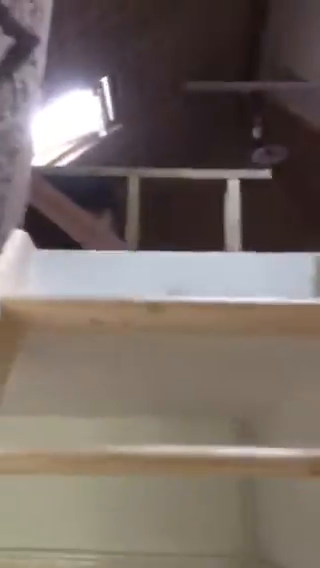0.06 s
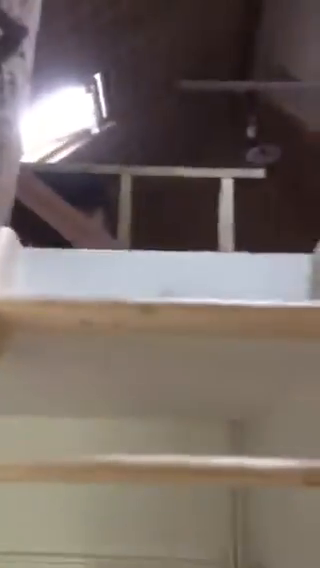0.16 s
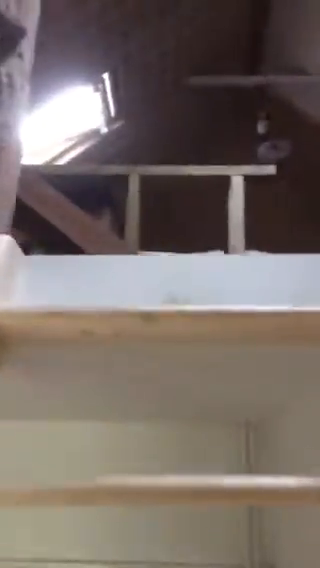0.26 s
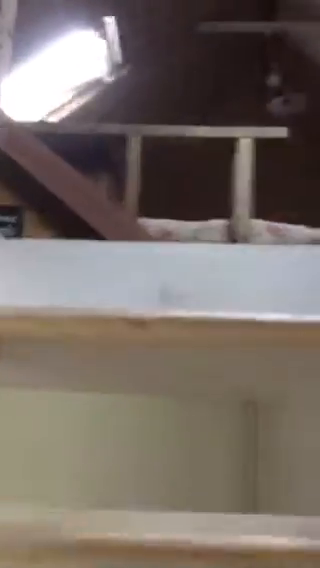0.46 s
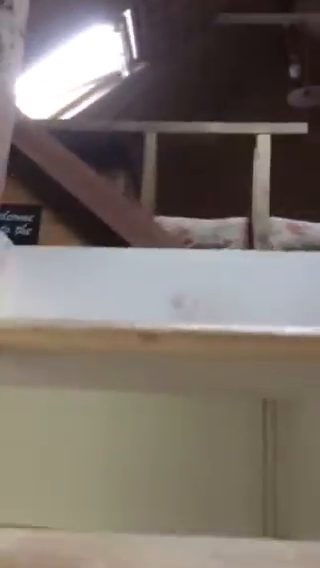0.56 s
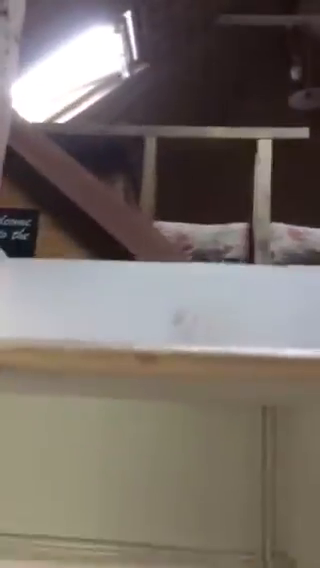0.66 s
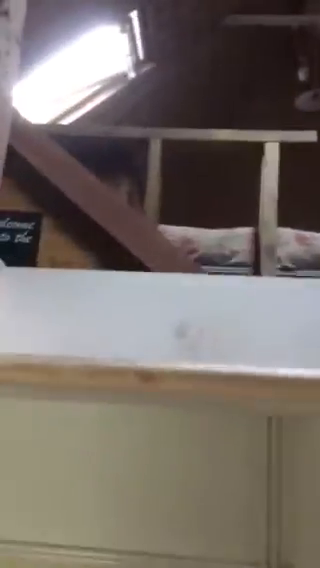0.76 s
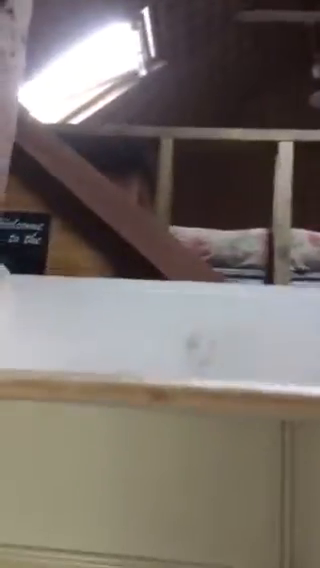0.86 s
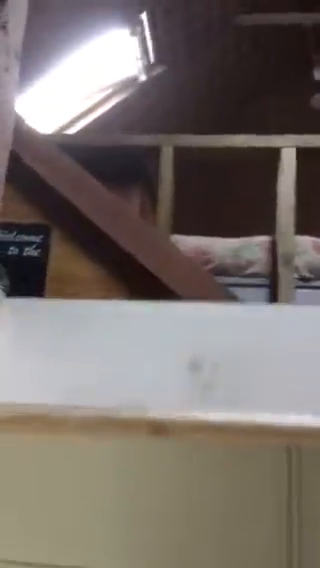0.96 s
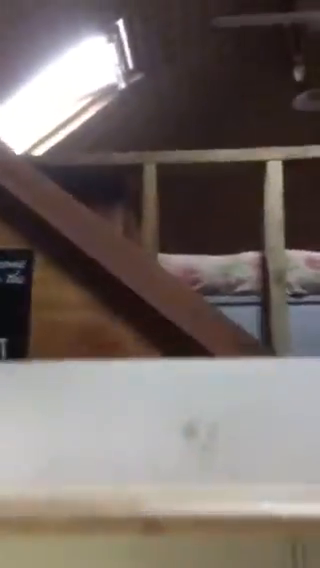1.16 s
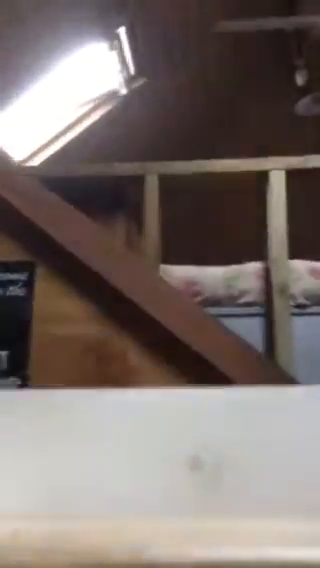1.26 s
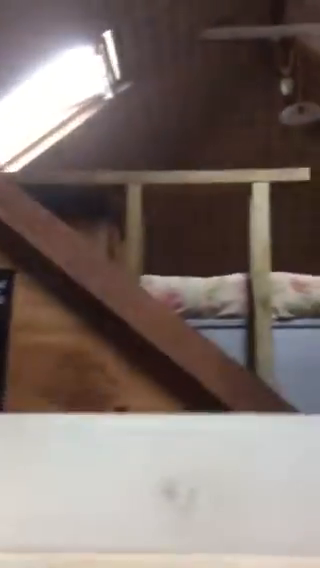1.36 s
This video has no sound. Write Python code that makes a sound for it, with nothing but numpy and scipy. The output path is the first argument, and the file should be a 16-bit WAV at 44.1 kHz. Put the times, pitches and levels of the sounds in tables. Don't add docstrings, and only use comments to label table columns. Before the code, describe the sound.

Two heavy footsteps on a wooden ladder-stair, close up: a hard heel slap with deep hollow boom, then soft sole scuffs and tiny catches, then a lighter knocking second step and faint creak, in a small attic.

```python
import sys
import numpy as np
from scipy import signal
from scipy.fft import rfft, irfft, next_fast_len
from scipy.io import wavfile
from scipy.ndimage import map_coordinates

SR = 44100
rng = np.random.default_rng(int(sys.argv[2]) if len(sys.argv) > 2 else 0)


def transcribe(u):
    v = np.clip(np.atleast_2d(u).T, -1, 1)
    q = np.round(v * 32767).astype(np.int16)
    wavfile.write(sys.argv[1], SR, q)


def makeup_ratio(level_db):
    decades = np.asarray(level_db, float) / 20
    return 10 ** decades


N = 61740
T = np.arange(SR * 3 // 4) / SR

# (time [s], slap level [dB], crack level [dB])
FIRST_STEP = [
    (.231, -39.5, -70),
    (.2353, -40.5, -60),
    (.245, -38, -53.5),
    (.254, -29.5, -34.5),
    (.28, -42.5, -62),
]
SECOND_STEP = [
    (.9207, -35, -59.5),
    (.926, -36.5, -57.5),
    (.936, -48.5, -68),
    (.9725, -42, -50),
]
# (frequency [Hz], level [dB])
FIRST_SLAP = [(260, -34), (450, -3.5), (862, -7), (1250, -4), (2260, -10), (3700, -14.5), (4600, -29),
              (6000, -30), (7800, -58), (13200, -120)]
SECOND_SLAP = [(250, -63), (450, -8), (800, -1.5), (1400, -14), (1750, -9), (2500, -14), (2900, -21),
               (6000, -35.5), (8000, -66), (13000, -120)]
# (frequency [Hz], level [dB])
CRACK_COLOUR = [(2060, -5.5), (3500, -1.5), (4180, -10.5), (6820, -1), (7650, -3), (11000, -6),
                (16000, -21)]

# (time [s], pitch [Hz], level [dB], time to fade by 60 dB [s], swell time [s])
FIRST_BOOM = [(.23, 264.2, -34.5, 0.26, 0.005), (.231, 304, -36.5, 0.32, 0.0034),
              (.231, 197, -36.5, 0.17, 0.0066), (.245, 412, -40, 0.22, 0.0046),
              (.245, 86.5, -58, .2, 0.032), (.257, 121.7, -17, 0.3, 0.016), (.261, 157.2, -17, 0.12, 0.014),
              (.238, 133, -38, 0.13, .01), (.335, 310, -45.5, 0.21, .015), (.33, 425, -52, .15, .012),
              (.27, 272.5, -34, 0.16, 0.0033), (.29, 59.8, -27, 0.39, 0.03), (.3, 113, -24.5, 0.26, 0.015),
              (.3, 144.8, -24, 0.34, 0.035), (.31, 193.1, -32.5, 0.36, 0.034),
              (.47, 61.1, -38, 0.36, 0.046), (.49, 143.6, -42.5, 0.24, 0.017),
              (.595, 271, -52, 0.14, 0.026), (.6, 336, -59, 0.15, 0.01)]
SECOND_BOOM = [(.9205, 475, -37, 0.067, 0.002), (.93, 77.7, -35.5, 0.27, 0.014),
               (.921, 159.4, -32.5, 0.17, 0.0029), (.921, 213, -36, 0.079, 0.0024),
               (.935, 264.4, -32.5, 0.2, 0.0066), (.944, 204.2, -24, 0.22, 0.015),
               (.98, 274.6, -39, 0.16, 0.008), (1.005, 150, -36, 0.29, 0.019), (.94, 245, -41, 0.46, 0.031),
               (.96, 153.8, -30.5, 0.4, 0.0073), (.97, 60, -35.5, 0.44, 0.015),
               (.99, 102.1, -43, 0.44, 0.06), (1.04, 204, -49, 0.3, 0.015),
               (1.105, 165.6, -37, 0.13, 0.016), (1.135, 183, -39.5, 0.14, 0.018),
               (1.14, 55.2, -40.5, 0.19, 0.02), (1.18, 79.7, -55, 0.36, 0.022)]
# (frequency [Hz], level [dB])
RUMBLE_COLOUR = [(30, -47), (55, -5.5), (150, 0), (300, -9), (500, -29.5), (900, -120)]
# (time [s], pitch [Hz], level [dB], time to fade by 60 dB [s])
BOARD_KNOCKS = [(.9207, 2100, -34.5, 0.036), (.9215, 650, -46, 0.017), (.925, 800, -34.5, 0.071),
                (.927, 874, -37, 0.068), (.922, 560, -51, 0.036), (.933, 948, -35.5, 0.068),
                (0.97, 1760, -35.5, 0.035), (0.96, 2200, -53, 0.026), (.975, 5400, -50.5, 0.029),
                (0.98, 3640, -49.5, .03), (0.98, 1152, -33, 0.027), (.9737, 2883, -41, 0.031),
                (0.25, 1700, -37, 0.084), (.26, 945, -40, 0.13), (.2585, 1226, -34, .04),
                (.2353, 3170, -41, 0.027), (.232, 3660, -45.5, .05), (.2313, 2620, -41, .03),
                (.29, 1400, -42.5, .04)]

# (start [s], length [s], level [dB], body pitch [Hz], brightness [dB])
SCUFF_STROKES = [(0.223, 0.038, -45.5, 2970, -14), (0.51, 0.11, -74, 650, -28),
                 (0.799, 0.098, -72.5, 316, -30), (1.089, 0.077, -70, 700, -30),
                 (0.496, 0.22, -67, 3530, 6), (0.396, 0.12, -67, 780, -30), (0.253, 0.098, -54, 2470, -8),
                 (0.43, 0.076, -62.5, 2500, 8.5), (.46, .12, -67.5, 2560, 4), (.845, .09, -75.5, 7700, 9),
                 (.56, .1, -65, 1600, -30), (0.553, 0.089, -60.5, 3420, 4), (0.558, 0.056, -63, 1670, -24),
                 (0.582, 0.087, -58.5, 2160, 4), (0.607, 0.057, -63.5, 1700, 1), (.645, 0.1, -66, 2200, 5),
                 (0.695, 0.046, -59, 2460, -4.5), (0.735, 0.17, -73, 2140, -20),
                 (0.841, 0.078, -75, 2100, 16), (0.871, 0.13, -67.5, 2250, 14.5),
                 (0.966, 0.035, -59, 3400, 5.5), (1.099, 0.074, -67, 2800, 12)]
# (frequency [Hz], level [dB])
GRIT_COLOUR = [(2650, -15.5), (4500, -10.5), (6630, -10), (7770, -12.5), (11900, -15), (16000, -22)]
# (time [s], level [dB], pitch [Hz])
JOINT_SLIPS = [(1.046, -71, 1010), (1.069, -54.5, 1783), (1.079, -52.5, 1788), (1.092, -56, 1786),
               (1.1059, -48.5, 1835), (1.115, -60, 1760), (1.122, -53, 1775), (1.129, -50, 1770),
               (1.133, -53.5, 2110), (1.139, -59, 2150), (1.145, -60, 1780), (1.152, -60.5, 1900)]
# (time [s], level [dB], pitch [Hz])
SOLE_CATCHES = [(.4533, -55, 2650), (.458, -52, 2570), (.47, -58, 3080), (.564, -56, 1500),
                (.576, -52, 2900), (.594, -51, 2270), (.601, -47, 2140), (.612, -56, 2500),
                (.6174, -48, 1650), (.623, -54, 2290), (.642, -53, 1490), (.66, -57, 2300),
                (.7042, -50, 2940), (.7112, -49, 2560), (.717, -52, 2800)]
# (time [s], level [dB], pitch [Hz])
DRY_TICKS = [
    (0.3308, -29.5, 11600),
    (.3315, -57, 6200),
    (.5035, -36, 13100),
]

# (frequency [Hz], time to fade by 60 dB [s])
ROOM_FADE = [(300, 0.27), (1000, 0.42), (3000, 0.38), (10000, 0.36)]
# (frequency [Hz], level [dB])
HISS_COLOUR = [(15, -58), (25, -6), (43, -14), (102, -1.5), (384, -14), (1100, -15.5), (1190, -14.5),
               (1840, -17.5), (16000, -30)]
# (frequency [Hz], level [dB])
SHIVER_COLOUR = [(90, -40), (150, -2), (190, 29), (280, -21)]


def unit(x):
    return x / np.sqrt(np.mean(x ** 2) + 1e-20)


def along(points, hz):
    f, value = np.transpose(points)
    return np.interp(np.log(hz + 1), np.log(f + 1), value)


def filtered(x, response):
    size = next_fast_len(len(x) + SR // 2)
    hz = np.fft.rfftfreq(size, 1 / SR)
    return irfft(rfft(x, size) * response(hz), size)[:len(x)]


def noise(colour, size, grainy=1):
    white = grainy * rng.standard_normal(size)
    return unit(filtered(white, lambda hz: makeup_ratio(along(colour, hz))))


def fade(t60, t=T):
    return makeup_ratio(-60 * t / t60)


def swell(rise_s):
    return 1 - np.exp(-T / rise_s)


def ring(hz, t60, swell_s, waver=0):
    return np.sin(2 * np.pi * hz * T + waver) * fade(t60) * swell(swell_s)


def add(track, s, sound):
    part = track[round(s * SR):][:len(sound)]
    part += sound[:len(part)]


def step(contacts, slap_colour):
    out = np.zeros(N)
    slap_shape = (fade(0.04) + makeup_ratio(-14.5) * fade(0.25)) * swell(0.0011)
    held = np.maximum(T - 0.0021, 0)
    crack_shape = fade(0.0087, held) + makeup_ratio(-11.5) * fade(0.33)
    for s, slap_db, crack_db in contacts:
        slap = makeup_ratio(slap_db) * noise(slap_colour, len(T)) * slap_shape
        crack = makeup_ratio(crack_db) * crack_shape * noise(CRACK_COLOUR, len(T))
        add(out, s, slap + crack)
        add(out, s, room(slap))
    return out


def boom(modes, rumble_db):
    out = np.zeros(N)
    sag, sag_s = 0.05, 0.03
    for s, hz, db, t60, swell_s in modes:
        waver = map_coordinates(rng.standard_normal(60), [T * 20])
        waver = 0.25 * (waver - waver[0])
        settling = 2 * np.pi * hz * sag * sag_s * swell(sag_s)
        add(out, s, makeup_ratio(db) * ring(hz, t60, swell_s, waver + settling))
    rumble = makeup_ratio(rumble_db) * fade(0.6) * swell(0.0061) * noise(RUMBLE_COLOUR, len(T))
    add(out, modes[0][0], rumble)
    return out


def knocks():
    out = np.zeros(N)
    for s, hz, db, t60 in BOARD_KNOCKS:
        add(out, s, makeup_ratio(db) * ring(hz, t60, 0.0015))
    return out


def scuffs():
    out = np.zeros(N)
    grains_per_s, grain_db, grain_top, grit_db = 900, 6, 6, -10
    for s, length, db, hz, bright_db in SCUFF_STROKES:
        chance, size = rng.random((2, len(T)))
        strength = np.minimum(makeup_ratio(-grain_db * np.log(size + 1e-9)), grain_top)
        grains = 1 + (chance < grains_per_s / SR) * strength
        stroke = np.sin(np.pi / 2 * np.interp(T / length, [0, 0.42, 1], [0, 1, 0])) ** 2
        catching = map_coordinates(rng.standard_normal(400), [T * 150])
        stroke = stroke * makeup_ratio(1.5 * catching)
        body_colour = [(hz * 2 ** (k * 0.52), -6 * k * k) for k in range(-3, 4)]
        body = noise(body_colour, len(T), grains)
        grit = makeup_ratio(grit_db + bright_db) * noise(GRIT_COLOUR, len(T), grains)
        add(out, s, makeup_ratio(db) * stroke * (body + grit))
    return out


def creak():
    out = np.zeros(N)
    # (events, time to fade by 60 dB [s], swell time [s])
    kinds = [(JOINT_SLIPS, 0.044, 0.0005), (SOLE_CATCHES, 0.011, 0.0002), (DRY_TICKS, 0.0005, 0.00005)]
    for events, t60, swell_s in kinds:
        for s, db, hz in events:
            add(out, s, makeup_ratio(db) * ring(hz, t60, swell_s))
    return out


def room(x):
    hz, t, grid = signal.stft(rng.standard_normal(SR // 2), SR, nperseg=256)
    fading = fade(along(ROOM_FADE, hz)[:, None], t)
    tail = signal.istft(grid * fading, SR, nperseg=256)[1]
    delayed = np.pad(x, (round(0.004 * SR), 0))
    return makeup_ratio(-3) * signal.fftconvolve(delayed, tail / np.linalg.norm(tail))[:N]


def background():
    middle_s, span_s = 0.857, 0.13
    shape = np.exp(-((np.arange(N) / SR - middle_s) / span_s) ** 2)
    shiver = shape * noise([(40, -120)] + SHIVER_COLOUR + [(500, -120)], N)
    return makeup_ratio(-69) * noise(HISS_COLOUR, N) + makeup_ratio(-67.5) * shiver


def scene():
    steps = step(FIRST_STEP, FIRST_SLAP) + step(SECOND_STEP, SECOND_SLAP)
    booms = boom(FIRST_BOOM, -35.5) + boom(SECOND_BOOM, -38.5)
    boards = knocks()
    small = scuffs() + creak()
    echo = room(makeup_ratio(-11) * small + makeup_ratio(-11) * boards)
    return (steps + booms + boards + small + echo + background())[None]


def top_cut(x):
    return signal.sosfilt(signal.butter(12, 16500, fs=SR, output="sos"), x)


def record(dry):
    def edge(hz):
        return makeup_ratio(-32 * np.clip((hz - 15950) / 370, 0, 1)) * (hz < 16480)
    mix = filtered(dry[0], edge)[None]
    return top_cut(mix)


dry = scene()
out = record(dry)
transcribe(out)
```